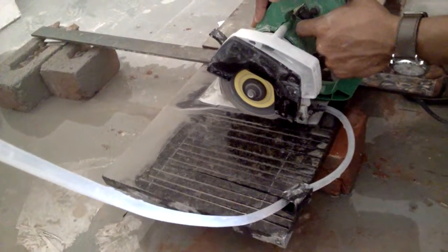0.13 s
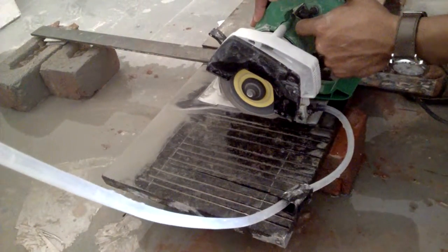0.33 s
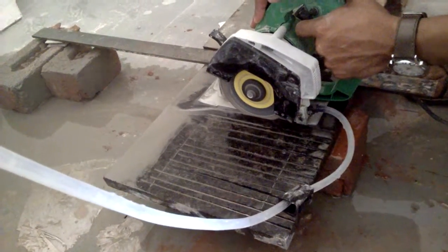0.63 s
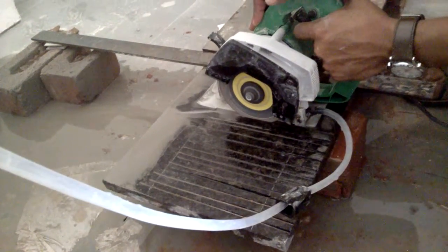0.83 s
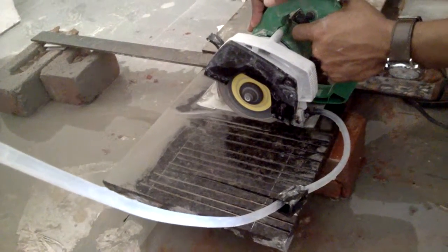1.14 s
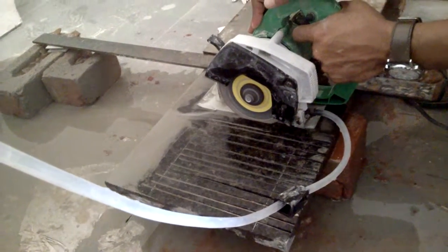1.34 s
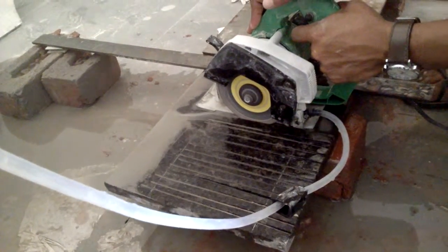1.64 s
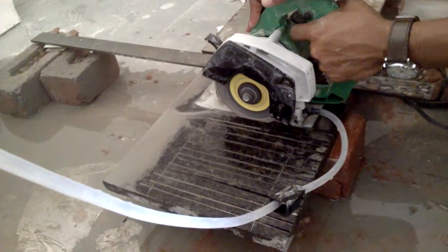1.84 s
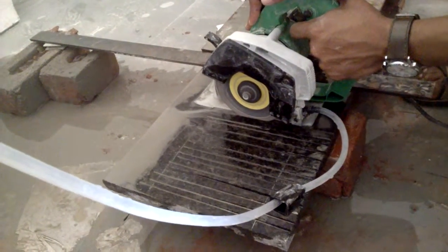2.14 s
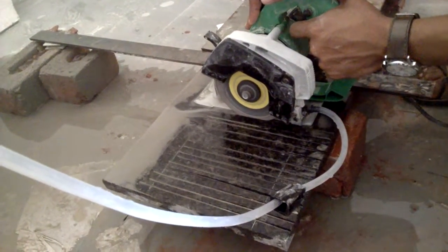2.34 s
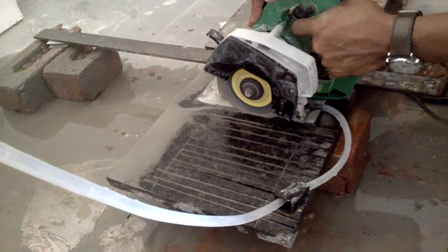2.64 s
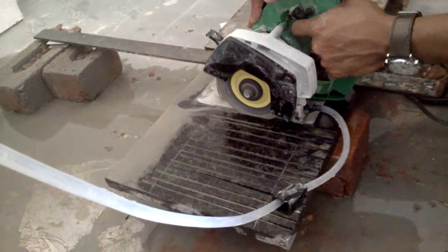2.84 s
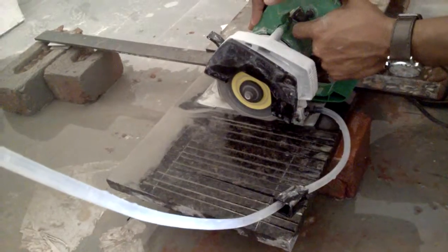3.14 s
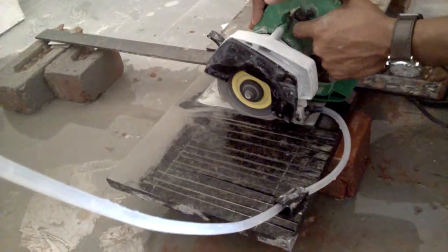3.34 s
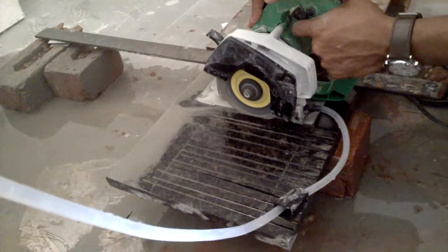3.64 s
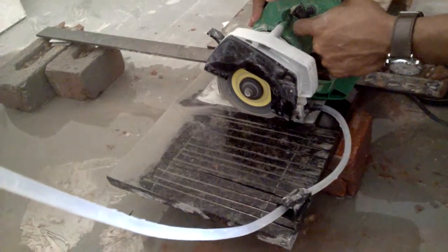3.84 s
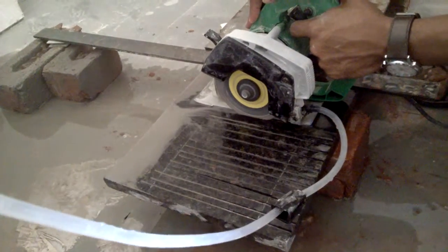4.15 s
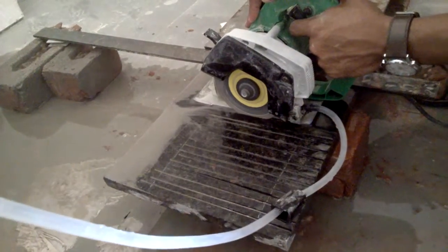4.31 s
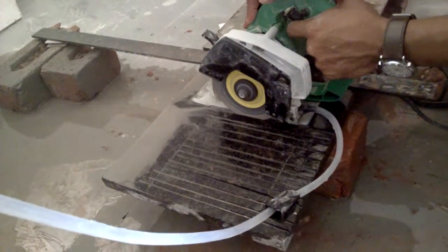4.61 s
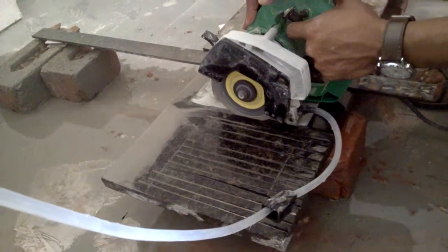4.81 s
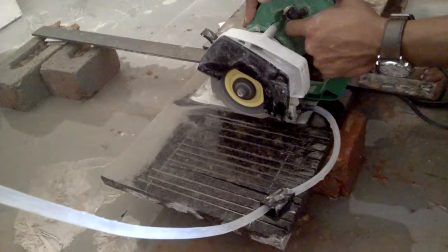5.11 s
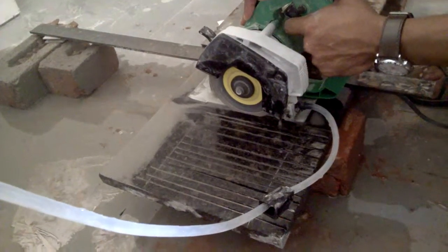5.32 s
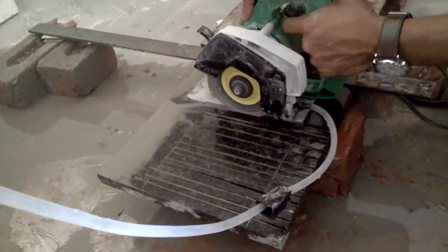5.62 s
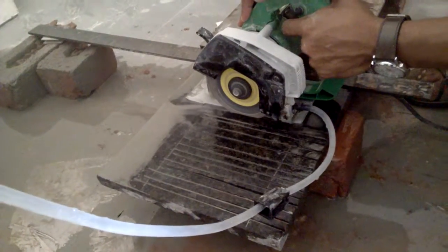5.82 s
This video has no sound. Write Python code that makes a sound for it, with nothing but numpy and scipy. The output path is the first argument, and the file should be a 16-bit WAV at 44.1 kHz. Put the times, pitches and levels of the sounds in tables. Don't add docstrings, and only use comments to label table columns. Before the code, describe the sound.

Already at full speed at the start and still cutting at the end, a wet diamond blade grinds a slab. Harsh metallic screech dominates, with fizzing upper ringing, a mid-range motor housing rattle and little bass. Pressure eases around two seconds and grows strongest after five, with brief catches and slips throughout. Close, dry, single-microphone sound outdoors.

```python
import sys
import numpy as np
from scipy import signal
from scipy.io import wavfile

SR = 44100
rng = np.random.default_rng(int(sys.argv[2]) if len(sys.argv) > 2 else 0)


def transcribe(u):
    v = np.clip(np.atleast_2d(u).T, -1, 1)
    q = np.round(v * 32767).astype(np.int16)
    wavfile.write(sys.argv[1], SR, q)


def volts(x):
    e = np.asarray(x, float) / 20
    return 10 ** e


N = 263271
CONTROL_STEP = 40
PINION, WHEEL, ARMATURE_SLOTS = 19, 37, 12
BLADE_PER_ARMATURE = PINION / WHEEL


def rms_one(x):
    return x / np.sqrt(np.mean(x ** 2) + 1e-20)


def in_time(rows):
    s, *columns = np.transpose(rows)
    return [np.interp(np.arange(N) / SR, s, column) for column in columns]


def to_samples(curve):
    return np.interp(np.arange(N) / CONTROL_STEP, np.arange(len(curve)), curve)


def drift(rate_hz):
    settle = 2000
    r = np.exp(-2 * np.pi * rate_hz * CONTROL_STEP / SR)
    noise = rng.standard_normal(N // CONTROL_STEP + 2 + settle)
    slow = signal.lfilter([1], [1, -2 * r, r * r], noise)[settle:]
    return to_samples(rms_one(slow))


def resonate(x, hz, width_hz):
    r = np.exp(-np.pi * width_hz / SR)
    zeros = np.array([1, 0, -1]) * (1 - r * r) / 2
    poles = [1, -2 * r * np.cos(2 * np.pi * hz / SR), r * r]
    return signal.lfilter(zeros, poles, x)


def grit(spread_db):
    impacts = rng.standard_normal((2, N))
    return rms_one(impacts * volts(spread_db * rng.standard_normal((2, N))))


# time in seconds, turns per second.
ARMATURE_SPEED = [(0.0, 413.04), (0.2, 411.62), (0.4, 409.5), (0.6, 407.17), (0.8, 406.86), (1.0, 407.4),
                  (1.39, 407.5), (1.79, 408.78), (2.39, 411.09), (2.6, 411.0), (2.98, 412.26),
                  (3.98, 412.37), (4.38, 414.2), (4.58, 413.3), (4.97, 414.49), (5.37, 410.16),
                  (5.77, 410.44), (5.97, 411.42)]


def armature_speed():
    return in_time(ARMATURE_SPEED)[0]


REGIONS_HZ = [3550, 3890, 4080, 4600, 7400, 12000]


def region_place(hz):
    return np.interp(np.log(hz), np.log(REGIONS_HZ), np.arange(len(REGIONS_HZ)))


def bumps(s, half_s):
    t = np.arange(0, N + CONTROL_STEP, CONTROL_STEP) / SR
    return np.exp(-.5 * ((t - s[:, None]) / np.reshape(half_s, (-1, 1))) ** 2)


# time in seconds, lift in dB, favoured pitch in Hz.
CATCHES = [(0.105, 4.5, 3950.0), (0.339, 4.5, 7400.0), (0.404, 2.2, 4600.0), (0.728, 4, 3950.0),
           (0.773, 3, 3550.0), (0.998, 6.5, 3550.0), (1.137, 4, 3950.0), (1.222, 3.5, 3550.0),
           (1.412, 6, 5800.0), (1.696, 3.5, 5800.0), (1.886, 6, 4250.0), (2.055, 1.5, 4600.0),
           (2.235, 2.6, 3550.0), (2.424, 3.2, 5800.0), (2.898, 6.5, 7400.0), (3.068, 2.2, 3950.0),
           (3.298, 3, 5800.0), (3.322, 11, 3550.0), (3.487, 2.5, 4600.0), (4.051, 2.6, 5800.0),
           (4.265, 4, 5800.0), (4.465, 1, 5800.0), (4.59, 6, 4600.0), (4.939, 2.7, 4250.0),
           (5.078, 3, 4600.0), (5.173, 3, 4600.0), (5.298, 3.5, 7400.0), (5.428, 8, 3550.0),
           (5.652, 4, 3550.0), (5.847, 3.0, 4600.0)]


def catches_db():
    half_s, spill, reach_regions, rim_boost = 0.012, 0.24, 1, 1.14
    s, lift_db, hz = np.transpose(CATCHES)
    distance = np.arange(len(REGIONS_HZ))[:, None] - region_place(hz)
    near = np.exp(-.5 * (distance / reach_regions) ** 2)
    lift = (spill + (1 - spill) * near) * lift_db @ bumps(s, half_s)
    lift[-1] *= rim_boost
    return lift


# time in seconds, loss in dB, half length in seconds.
SLIPS = [(0.15, -1, 0.02), (0.22, -7, 0.0089), (0.557, -5.5, 0.019), (0.659, -3, 0.015), (0.875, -3, 0.04),
         (1.06, -5, 0.0087), (1.312, -3.0, 0.013), (1.606, -1.7, 0.033), (2.1, 0, 0.012),
         (2.3, -2.6, 0.018), (2.584, -5, 0.016), (2.774, -4.5, 0.013), (3.25, -1, 0.012),
         (3.35, -1.8, 0.01), (3.542, -1.5, 0.036), (3.65, -1.8, 0.012), (3.75, -1.3, 0.036),
         (4.177, -6, 0.026), (4.355, 0, 0.012), (4.714, -4.5, 0.02), (4.846, -6, 0.0087),
         (5.52, -1.7, 0.058), (5.78, -4.5, 0.011), (5.95, -3.5, 0.014)]
SLIP_SHARE = [0.71, 1.1, .7, 1, 0.79, 1.02]


def slips_db():
    s, loss_db, half_s = np.transpose(SLIPS)
    return np.outer(SLIP_SHARE, loss_db) @ bumps(s, half_s)


# time in seconds, feed pressure in dB, depth as lean to the middle modes in dB.
FEED = [(0.0, 0.5, -1), (0.4, 2.5, -3), (0.85, -0.5, -1.5), (1.25, -0.7, -3), (1.6, -2.4, -1.5),
        (2.0, -3.2, -1.3), (2.5, -1.1, -4), (3.0, -2, -3), (3.45, -0.3, -0.5), (3.9, -0.3, -2.7),
        (4.2, -1.3, 0.5), (4.6, 0, 1.2), (4.95, 0.8, 1.5), (5.3, 3.5, -1.2), (5.65, 3, 0.5), (5.97, 1.2, 3)]
FEED_SHARE = [1.27, 1.17, 1, 1.01, 0.38, 0.79]
DEPTH_SHARE = [-0.46, -0.34, 0.86, 0.48, -0.19, -0.46]


def bite_db():
    feed_db, depth_db = in_time(FEED)
    events = [to_samples(row) for row in catches_db() + slips_db()]
    return np.outer(FEED_SHARE, feed_db) + np.outer(DEPTH_SHARE, depth_db) + events


def drive_db(turns):
    throb_db = [0.7, 0.87, 0.7, 1.1, 0.77, 1.6]
    chatter_db = [0.48, 1.8, 0.49, 0.53, 0.82, 1.67]
    runout_db = 0.13
    bite = bite_db()
    throb = -np.cos(2 * np.pi * turns / WHEEL)
    runout = np.cos(2 * np.pi * turns * BLADE_PER_ARMATURE)
    chatter = drift(24) + 0.46 * drift(70)
    swing = np.outer(throb_db, throb) + np.outer(chatter_db, chatter) + runout_db * runout
    return bite - bite.mean(axis=1, keepdims=True) + swing


def drive_at(drive, hz):
    place = region_place(hz)
    k = min(int(place), len(drive) - 2)
    blend_db = drive[k] + (place - k) * (drive[k + 1] - drive[k])
    share = np.interp(hz, [300, 2000, 3300], [.05, .25, 1])
    return volts(share * blend_db)


# frequency in Hz, level in dB per band.
HISS = [(30, -78), (45, -72), (100, -85), (190, -76), (330, -73), (520, -65.5), (800, -58), (1500, -58),
        (2800, -56.5), (4000, -54), (4900, -60), (6000, -59), (7100, -67.5), (15500, -81)]


def hiss(drive):
    patchy_db = 0.55
    out, grains = np.zeros(N), grit(2.5)
    edges_hz = 24 * 2 ** np.arange(0, 9.6, 1 / 4)
    hz_points, db_points = np.transpose(HISS)
    spray = np.outer([0.4, 0.37, 0.37, 0.52, 0.4, 0.65], drive[-1])
    for k, (low, high) in enumerate(zip(edges_hz, edges_hz[1:])):
        hz = np.sqrt(low * high)
        level_db = np.interp(np.log(hz), np.log(hz_points), db_points) + patchy_db * drift(7.3)
        band_pass = signal.butter(2, [low, high], "band", fs=SR, output="sos")
        band = signal.sosfilt(band_pass, grains[k % 2])
        out += band * volts(level_db) * drive_at(spray, hz)
    return out


def lines(orders, turns, waver_db):
    out = np.zeros(N)
    for (order, level_db), start in zip(orders, rng.random(len(orders))):
        gain = np.sqrt(2) * volts(level_db + waver_db * drift(1.36))
        out += gain * np.sin(2 * np.pi * (order * turns + start))
    return out


# multiple of armature speed, level in dB rms.
ARMATURE = [(1.514, -65), (3.544, -49.5)]


def armature_lines(turns):
    return lines(ARMATURE, turns, waver_db=4.0)


# multiple of blade speed, level in dB rms.
SPINDLE = [(1, -66), (2, -60), (3, -62), (4, -59), (5, -54), (6, -52), (7, -54), (8, -51), (9, -60),
           (14, -54), (15, -54), (19, -48), (30, -57), (31, -52)]


def spindle_lines(turns):
    return lines(SPINDLE, turns * BLADE_PER_ARMATURE, waver_db=1.0)


# centre in Hz, half width in Hz, lift in dB.
SWELL_HZ = [411.2, 825, 1049, 3552, 3762, 3814, 4389, 4452, 4938, 5285]
SWELL_WIDTH_HZ = [2.3, 5, 11.5, 14, 8.4, 15, 6.5, 15, 22, 17]
SWELL_DB = [8.6, 9.1, 7.4, 9.7, 14, 11, 7.5, 7.9, 10.8, 3]


def swell_db(hz):
    span_hz = np.linspace(hz.min(), hz.max(), 200)
    lift_db = sum(db / (1 + ((span_hz - centre) / width) ** 4)
                  for centre, width, db in zip(SWELL_HZ, SWELL_WIDTH_HZ, SWELL_DB))
    return np.interp(hz, span_hz, lift_db)


def slot_whine(turns, per_s):
    level_db = -43.5 + swell_db(ARMATURE_SLOTS * per_s) + 1.1 * drift(12)
    return np.sqrt(2) * volts(level_db) * np.sin(2 * np.pi * ARMATURE_SLOTS * turns)


# multiple of armature speed, level off resonance in dB rms, bite following in dB per dB.
SINGING = [1, 2, 2.577, 17 * PINION / WHEEL, 18 * PINION / WHEEL, 21 * PINION / WHEEL, 25 * PINION / WHEEL]
SINGING_DB = [-62, -59, -49, -45, -52, -47.5, -43]
SINGING_BITE = [.1, .1, .2, 0.79, 1, 2.06, 1.1]


def singing(turns, per_s, drive):
    flutter_db, phase_rad = 2.0, 0.3
    out = np.zeros(N)
    for order, line_db, bite in zip(SINGING, SINGING_DB, SINGING_BITE):
        level_db = line_db + swell_db(order * per_s) + flutter_db * drift(7.3)
        gain = volts(level_db) * drive_at(drive, order * per_s[0]) ** bite
        out += np.sqrt(2) * gain * np.sin(2 * np.pi * order * turns + phase_rad * drift(6))
    return out


CLOSING_DB = {3350: -3, 6110: -4, 6545: -2, 7970: -7, 8900: 4, 9540: 4, 9880: -4, 10980: -4, 11530: -3}
CLOSING_S = (2.8, 3.6)


def ringing(modes, drive, level_db, wander_db, skirt):
    out, grains = np.zeros(N), grit(1.8)[0]
    shifts = rng.integers(0, N, len(modes))
    for (hz, width_hz, mode_db), shift in zip(modes, shifts):
        push = np.roll(grains, shift) * drive_at(drive, hz) * volts(mode_db + wander_db * drift(5.5))
        if hz in CLOSING_DB:
            half_db = CLOSING_DB[hz] / 2
            push *= volts(np.interp(np.arange(N) / SR, CLOSING_S, [-half_db, half_db]))
        out += resonate(resonate(push, hz, width_hz), hz, skirt * width_hz)
    return volts(level_db) * out


# frequency in Hz, width in Hz, level in dB.
HOUSING = [(275, 12, -71), (630, 30, -63), (745, 50, -53), (980, 50, -55), (1055, 40, -52), (1145, 35, -51),
           (1250, 40, -55), (1400, 25, -53), (1465, 40, -50), (1680, 40, -55), (2060, 70, -56)]


def housing(drive):
    return ringing(HOUSING, drive, level_db=-2.5, wander_db=2.5, skirt=1.47)


# frequency in Hz, width in Hz, level in dB.
RIM = [(7970, 35, -47), (8195, 56, -52), (8430, 150, -56), (8900, 80, -60), (9075, 53, -54),
       (9330, 200, -70), (9540, 50, -60), (9880, 75, -59), (10115, 27, -58), (10335, 60, -58),
       (10500, 120, -60), (10760, 120, -68), (10980, 60, -60), (11170, 64, -55), (11530, 130, -63),
       (11800, 150, -67), (12350, 90, -60), (12700, 250, -73), (12990, 65, -55), (13150, 200, -66),
       (14230, 150, -68), (14600, 170, -69), (15320, 60, -68)]


def rim(drive):
    return ringing(RIM, drive, level_db=-2.2, wander_db=1.5, skirt=7)


# frequency in Hz, width in Hz, level in dB.
DISC = [(3350, 90, -50), (3470, 40, -51), (3545, 46, -40), (3605, 30, -50), (3885, 45, -42),
        (3960, 70, -46), (4030, 70, -45), (4095, 40, -48), (4180, 40, -53), (4250, 60, -51),
        (4325, 30, -49), (4395, 20, -46), (4455, 50, -42), (4515, 60, -44), (4605, 30, -50),
        (5180, 80, -57), (5268, 32, -45), (5315, 35, -45), (5362, 30, -44), (6110, 70, -55),
        (6283, 42, -50), (6440, 30, -54), (6545, 37, -42), (6650, 40, -55)]


def disc(drive):
    return ringing(DISC, drive, level_db=-1.6, wander_db=0.1, skirt=2.12)


def scene():
    per_s = armature_speed()
    turns = np.cumsum(per_s) / SR
    drive = drive_db(turns)
    cut = hiss(drive) + housing(drive) + rim(drive) + disc(drive)
    shafts = armature_lines(turns) + spindle_lines(turns)
    drive_train = shafts + slot_whine(turns, per_s) + singing(turns, per_s, drive)
    cut_gain_db = 33
    return (volts(cut_gain_db) * cut + drive_train)[None]


def band_limit(x):
    return signal.sosfilt(signal.butter(12, 15750, fs=SR, output="sos"), x)


def record(dry):
    return band_limit(dry)


dry = scene()
out = record(dry)
transcribe(out)
```